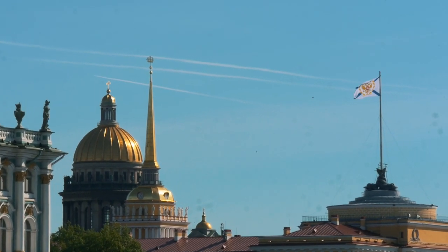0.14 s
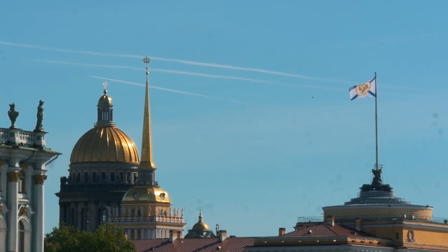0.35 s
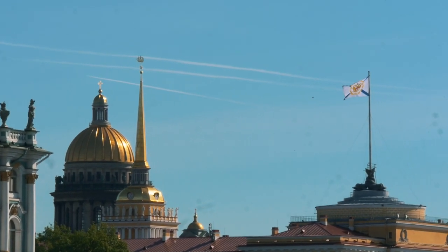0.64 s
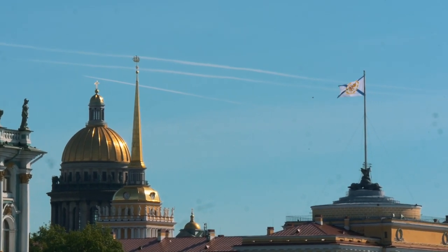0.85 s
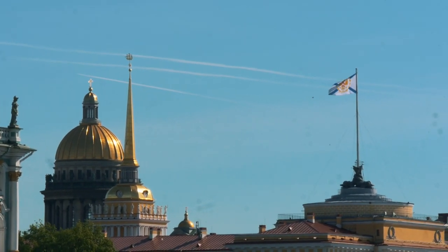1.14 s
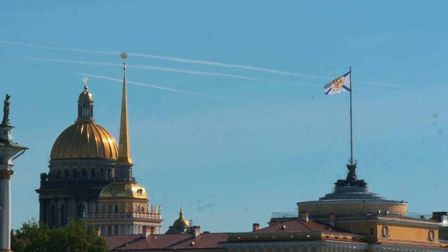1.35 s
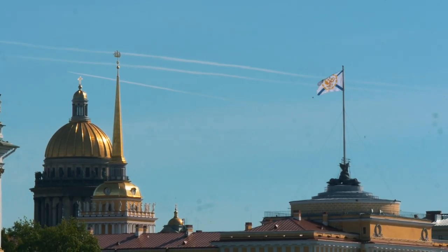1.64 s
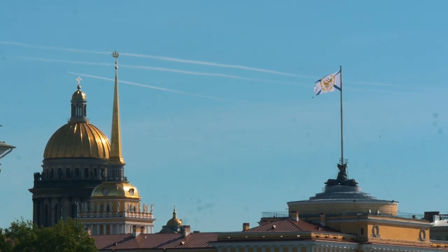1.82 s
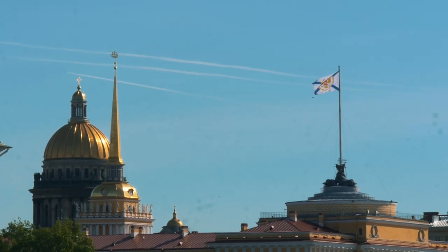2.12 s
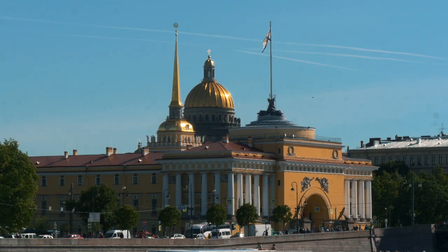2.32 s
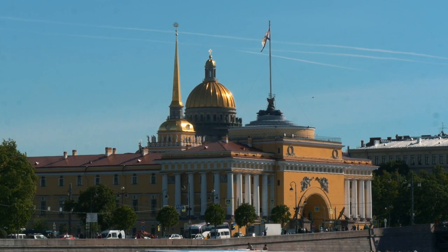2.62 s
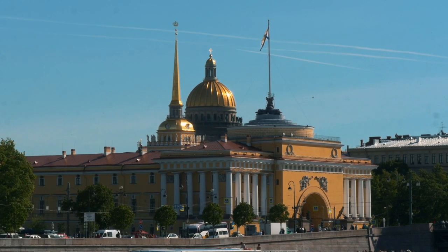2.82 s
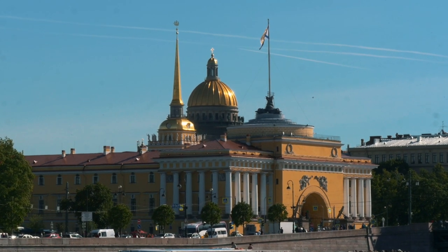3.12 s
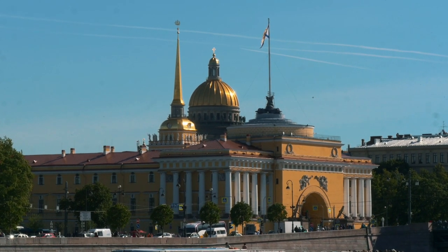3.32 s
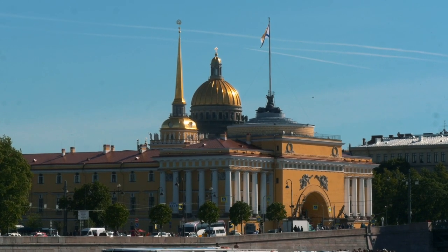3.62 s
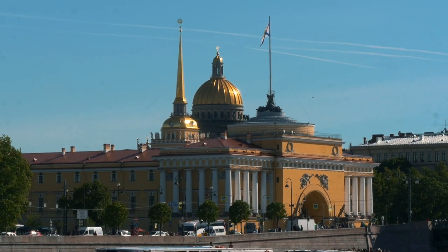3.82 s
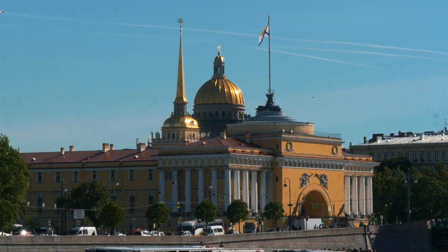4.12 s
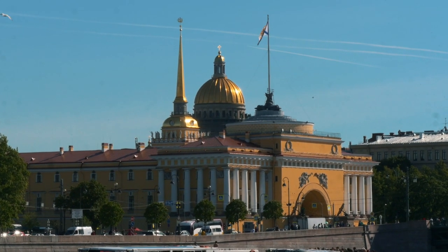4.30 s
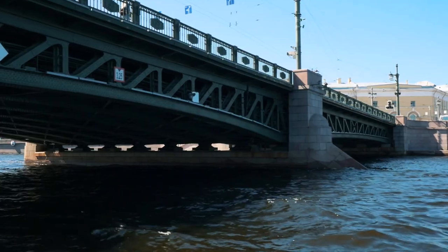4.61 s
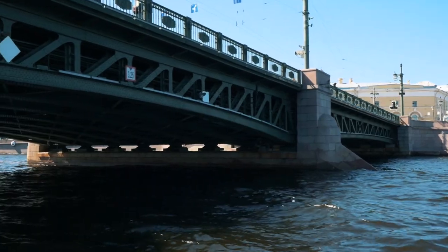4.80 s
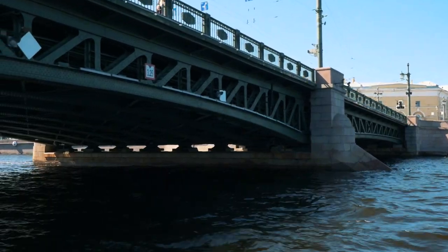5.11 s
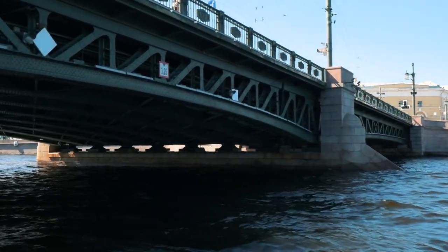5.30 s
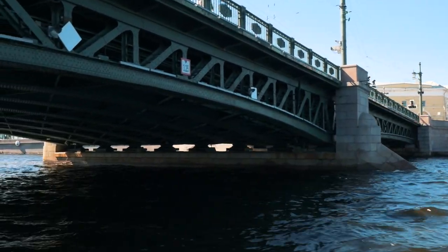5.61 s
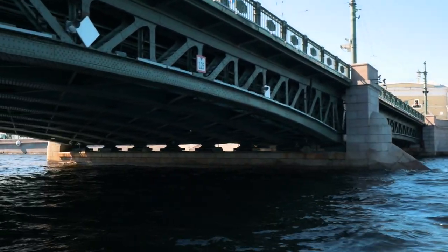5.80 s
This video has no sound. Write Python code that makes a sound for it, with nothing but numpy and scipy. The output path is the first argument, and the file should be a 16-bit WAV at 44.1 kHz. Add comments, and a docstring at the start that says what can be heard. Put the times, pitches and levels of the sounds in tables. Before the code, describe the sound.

Steady low boat engine hum beats ever faster beneath hollow hull booms and a soft rushing wash that swells strongly near the end.

```python
"""Two diesel engines drone on the deck of a river tour boat, while a swell of roar and hiss is already sinking.
One engine drops behind the other, mostly further and further, so their hum throbs faster.
Each engine is a stack of sine waves locked to its turning; a hull panel booms on one of them.
Filtered noise makes the rough engine room and the hiss of bow wash and wind, which surge together.
Hollow resonances of hull and cabin rise and fade: noise and engine tones passed through narrow filters."""
import sys
import numpy as np
from scipy import signal
from scipy.fft import rfft, irfft, next_fast_len
from scipy.io import wavfile
from scipy.ndimage import uniform_filter1d, map_coordinates

SR = 44100
rng = np.random.default_rng(int(sys.argv[2]) if len(sys.argv) > 2 else 0)


def dump(signal):
    """Clip the signal to [-1, 1] and save it as 16-bit WAV at the path in sys.argv[1]."""
    limited = np.clip(np.atleast_2d(signal).T, -1, 1)
    pcm = np.round(limited * 32767).astype(np.int16)
    wavfile.write(sys.argv[1], SR, pcm)


N = 262395  # length in samples

CYCLE_HZ = 16.245  # full working cycles per second; one cycle is two turns of the crankshaft
FIRING_ORDER, PANEL_ORDER = 6, 20  # multiples of the cycle rate: six firings, and the booming tone
TOP_HZ = 15550  # nothing is kept above this pitch
EDGE_S = .004  # fade at either end

# In all tables, left_right_db is how much louder the left side is than the right.
# Noise colours give only the shape of a spectrum; the loudness is set where they are used.

# Colour of the bow wash and wind: pitch_hz, level_db (per Hz)
WASH_COLOUR = [(200, -7), (600, -17.5), (1200, 3.5), (1700, 1), (2500, -3.5), (4000, -9), (6300, -12.5),
               (7500, -14), (11000, -19), (13500, -24), (15500, -23.5)]
# Colour of the spray: pitch_hz, level_db (per Hz)
SPRAY_COLOUR = [(500, -14), (1000, 3), (2400, 1), (5500, -7), (8500, -17), (14000, -28)]
# Small waves at the bow: peak_s, rise_s, fall_s, spray_level_db
BOW_WAVES = [(0.79, 0.06, 0.04, -52), (2.355, .012, 0.022, -52), (2.98, 0.22, 0.06, -49.5)]
# Steady hums of other machinery on board: pitch_hz, level_db, left_right_db
MACHINE_HUMS = [(52.5, -51, 0.5), (158, -51.5, 3), (1265, -58, -13)]
# Colour of the deck's rumble: pitch_hz, level_db (per Hz)
RUMBLE_COLOUR = [(10, -19), (25, -16), (45, -7.5), (65, -3.5), (90, -6), (110, -6), (132, -7), (155, 1),
                 (175, -3), (205, -2.5), (260, -12), (400, -40), (800, -90)]
# Colour of the engine room's roar: pitch_hz, level_db (per Hz)
ROAR_COLOUR = [(120, -14.5), (210, -11.5), (260, -3), (310, -0.5), (370, -6.5), (420, -5), (500, -4),
               (610, -9), (700, -6), (810, -10.5), (910, -10), (1100, -18), (1600, -27.5), (3000, -55),
               (8000, -81)]
# Resonances of hull and cabin: peak_s, rise_s, fall_s, centre_hz, width_hz, level_db, left_right_db
RESONANCES = [(.03, .2, .15, 260, 55, -33, -4), (.02, .3, .26, 470, 140, -30.5, -7),
              (.05, .3, .18, 670, 110, -38.5, -6), (1.18, .06, .15, 680, 45, -37, -7),
              (2.45, .35, .4, 480, 120, -39.5, -5), (2.8, .25, .2, 900, 160, -47, -2),
              (2.9, .3, .25, 158, 26, -42, 3), (4.55, .25, .35, 270, 80, -35.5, -4),
              (4.65, .3, .35, 490, 110, -36, -7), (5.1, .3, .8, 160, 36, -40, 0),
              (5.15, .16, .42, 368, 45, -32, -3), (5.3, .27, .27, 710, 190, -32.8, -7),
              (5.33, .5, .5, 260, 55, -29, -8), (5.48, .3, .28, 470, 130, -30, -8)]
# Colour of combustion noise ringing the hull panel: pitch_hz, level_db (per Hz)
PANEL_COLOUR = [(230, -50), (275, -10), (320, -7), (345, -1), (362, 0), (385, -6), (420, -16), (520, -90)]
# Loudness of the hull panel's boom: time_s, level_db
BOOM_LEVEL = [(0, -29), (0.2, -30.5), (0.35, -38), (0.58, -34), (0.8, -28), (1.08, -24.5), (1.33, -28),
              (2.2, -27), (2.58, -33), (2.85, -28.5), (4.0, -32), (4.25, -37), (4.65, -26), (4.95, -23.3),
              (5.25, -28), (5.5, -30), (5.72, -34.5), (5.95, -34.5)]
# Swing of the boom's phase as the crankshaft speeds up and slows within each turn: time_s, swing_radians
CRANK_SWING = [(0, .4), (.45, .2), (1.0, .42), (1.7, .68), (2.3, .55), (2.6, .48), (3.0, .62), (4.0, .68),
               (4.3, .95), (4.75, .42), (5.3, .7)]
# Firing note of the first engine's exhaust: time_s, level_db, left_right_db
EXHAUST_NOTE = [(0, -28.2, 4), (.6, -28.6, 3), (1, -26.6, 3), (2, -28.6, 3), (2.5, -26.6, 2.5),
                (3.5, -29.3, 1), (4.15, -30, 1), (4.4, -26.3, 6), (4.55, -29.5, 6), (4.7, -25, 8),
                (4.88, -25.3, 14), (5.3, -32, 12), (5.55, -32, 5), (5.75, -28, 3), (5.95, -29.5, 3)]
# Tones of the first engine: order (multiple of the cycle rate), level_db (before swelling), left_right_db
ENGINE_TONES = [(2, -54.5, 2), (4, -52, 0), (5, -54, 6), (7, -45, -3), (10, -55, 6), (11, -56, 10),
                (12, -55, -5), (14, -47, -2), (16, -43, 1), (17, -52, -2), (19, -52, 1), (24, -51, 1),
                (26, -52.5, -10), (27, -52.5, -6), (30, -53, -8), (31, -55, -6), (32, -55, 2),
                (34, -55, -3), (38, -55, -3), (42, -52.5, -8), (44, -56.5, -12), (55, -63, -4)]
# How far an engine tone follows the roar: pitch_hz, follow (dB per dB of roar)
TONE_FOLLOW = [(100, 0.5), (190, .6), (245, .9), (300, 0.5), (470, 1.3), (700, .8)]
# How far the second engine's firing rate lags as it slows unevenly: time_s, lag_hz
FIRING_LAG = [(.14, 0), (.5, 1.2), (1.0, 1.7), (1.95, 2.6), (2.55, 3.25), (2.95, 2.9), (3.3, 3.3),
              (4.0, 3.5), (4.4, 3.85), (4.8, 4.4), (5.95, 5.3)]
# Surges of roar and wash: start_s, end_s, roar_gain_db, wash_gain_db
SURGES = [(-2.0, -.32, 3.2, 4.0), (.45, .6, .3, 1.2), (.8, 1.1, 1.2, .3), (4.1, 5.34, 5, 6.9)]
# Stereo balance of the noise: pitch_hz, left_right_db
NOISE_BALANCE = [(35, 0), (100, 3.5), (220, -2), (330, -3), (480, -5), (700, -4.5), (1200, -2.5),
                 (2400, -1), (7000, -1), (14000, 0.5)]
# How far the left side leads the right: pitch_hz, lead_radians
LEFT_LEAD = [(30, 2.9), (80, 2.75), (100, 2.66), (160, 1.1), (230, 1.7), (325, 1.25), (430, .6), (700, .6),
             (1000, 0)]
# How alike the noise is on both sides: pitch_hz, alike (0 to 1, share of power in common)
NOISE_ALIKE = [(50, 0.81), (130, 0.53), (300, 0.83), (640, 0.19), (1400, 0.28), (3100, 0.4), (7000, 0.12),
               (15000, .05)]

# Starting levels, without the surges, and how fast they ease off
ROAR_DB, ROAR_EASE_DB_PER_S = -35, .23
WASH_DB, WASH_EASE_DB_PER_S = -47.5, .25
# In a surge the wash takes longer than the roar to reach its full gain, and longer to sink back
ROAR_RISE_S, ROAR_FALL_S = .65, .72
WASH_RISE_S, WASH_FALL_S = .8, .96
PANEL_NOISE_DB = -12.5  # compared with the boom
TWIN_EXHAUST_DB, TWIN_EXHAUST_LEFT_DB = -31.2, 2  # the second exhaust holds its level
TWIN_LEFT_DB = -9  # left-right dB: the second engine's overtones come from the right
UNEVEN_DB = .9  # the exhaust note wavers from cycle to cycle


def amp(db):
    """Turn decibels into gain."""
    return 10 ** (np.asarray(db) / 20)


def unit(x):
    """Scale to an average (rms) strength of 1."""
    return x / np.sqrt(np.mean(np.abs(x) ** 2) + 1e-20)


def along(points, hz):
    """Read a table of pitch and value at any pitch, on a log pitch axis."""
    f, value = np.transpose(points)
    return np.interp(np.log(hz + 1), np.log(f + 1), value)


def curves(rows):
    """Turn each column after the time into one value per sample."""
    s, *columns = np.transpose(rows)
    return [np.interp(np.arange(N) / SR, s, column) for column in columns]


def wobble(rate):
    """Draw a smooth random curve with the given number of random points a second."""
    coarse = np.arange(0, N + 64, 64)
    knots = rng.standard_normal(512)
    smooth = map_coordinates(knots, [coarse * rate / SR], mode="wrap")
    return np.interp(np.arange(N), coarse, smooth)


def bump(peak, rise_s, fall_s):
    """Make a bell curve that rises to 1 at its peak time and dies away."""
    t = np.arange(N) / SR
    return np.exp(-((t - peak) / np.where(t < peak, rise_s, fall_s)) ** 2)


def filtered(x, response):
    """Filter a sound by multiplying its spectrum with a response."""
    m = next_fast_len(N + SR // 2)
    spectrum = rfft(x, m) * response(np.fft.rfftfreq(m, 1 / SR))
    return irfft(spectrum, m)[..., :N]


def ports(hz, left_right_db):
    """Place a sound in stereo by a level difference and a phase lead, keeping its mean power."""
    sides = np.array([[.5], [-.5]])
    gain = amp(sides * left_right_db)
    level = gain / np.sqrt(np.mean(gain ** 2, axis=0))
    return level * np.exp(1j * sides * along(LEFT_LEAD, hz))


def rush(spectrum, patchy_db):
    """Make coloured stereo noise of rms 1, in patches of random gain and partly alike on both sides."""
    z = signal.stft(rng.standard_normal((3, N)), nperseg=512)[2]
    field = uniform_filter1d(rng.standard_normal(z.shape[1:]), size=6, axis=0)
    field = uniform_filter1d(field, size=14, axis=1)
    noise = signal.istft(z * amp(patchy_db * unit(field)), nperseg=512)[1][:, :N]

    def share(hz):
        return np.clip(along(NOISE_ALIKE, hz), 0, 1)

    def colour(hz):
        return amp(along(spectrum, hz)) * ports(hz, along(NOISE_BALANCE, hz))

    common = filtered(noise[2], lambda hz: colour(hz) * np.sqrt(share(hz)))
    separate = filtered(noise[:2], lambda hz: colour(hz) * np.sqrt(1 - share(hz)))
    return unit(common + separate)


def surge(t, start, end, rise_s, fall_s):
    """Swell smoothly from 0 towards 1 after the start, and sink back after the end."""
    def ramp(u):
        return np.sin(np.pi / 2 * np.clip(u, 0, 1)) ** 2

    return ramp((t - start) / rise_s) * (1 - ramp((t - end) / fall_s))


def flow():
    """Set the levels of roar and wash in dB: a slow easing, lifted by each surge."""
    t = np.arange(N) / SR
    roar_db = ROAR_DB - ROAR_EASE_DB_PER_S * t
    wash_db = WASH_DB - WASH_EASE_DB_PER_S * t
    for start, end, roar_gain_db, wash_gain_db in SURGES:
        roar_db = roar_db + roar_gain_db * surge(t, start, end, ROAR_RISE_S, ROAR_FALL_S)
        wash_db = wash_db + wash_gain_db * surge(t, start, end, WASH_RISE_S, WASH_FALL_S)
    return roar_db, wash_db


def crank(unsteady_hz):
    """Track the cycle angle of an engine whose governor hunts a little for its speed."""
    return 2 * np.pi * np.cumsum(CYCLE_HZ + unsteady_hz * wobble(9)) / SR


def pulsing(first, throb, chug):
    """Make the noise strength pulse with the cycle, the crankshaft and the firings."""
    slow = np.cos(first) + np.cos(2 * first)
    firings = np.cos(3 * first) + np.cos(6 * first)
    return 1 + throb * slow + chug * firings


def wash(wash_db):
    """Bow wash and wind are a fine, slightly patchy hiss; small waves breaking at the bow add spray."""
    hiss = amp(wash_db + 0.45 * wobble(20)) * rush(WASH_COLOUR, patchy_db=0.62)
    splashes = sum(amp(db) * bump(peak, rise, fall) for peak, rise, fall, db in BOW_WAVES)
    return hiss + splashes * rush(SPRAY_COLOUR, patchy_db=3.0)


def machinery():
    """Other machines give faint, slightly wavering hums that do not keep step with the engines."""
    t = np.arange(N) / SR
    hums = np.zeros((2, N))
    for hz, db, left_right_db in MACHINE_HUMS:
        angle = 2 * np.pi * hz * t + 1.56 * wobble(3.86)
        hums += np.real(amp(db) * np.exp(1j * angle) * ports(hz, left_right_db))
    return hums


def engine_room(pulse, roar_db, load_db):
    """Rough combustion noise pulses with the engine, over a rumble of the deck."""
    roar = amp(roar_db) * unit(pulse * rush(ROAR_COLOUR, patchy_db=0.57))
    rumble = amp(-40.5 + 0.54 * load_db) * rush(RUMBLE_COLOUR, patchy_db=-1.0)
    return roar + rumble


def howls(first, pulse, tonal):
    """Each hollow resonance rings with combustion noise and with the engine tones that fall inside it."""
    length = next_fast_len(N)
    hz = np.fft.rfftfreq(length, 1 / SR)[:N // 12]  # only the low part of the spectrum is needed
    share = np.clip(along(NOISE_ALIKE, hz), 0, 1)
    tonal = np.clip(tonal, 0, 1)  # share of power that is tone rather than noise
    orders = np.arange(8, 52)
    starts = rng.uniform(0, 2 * np.pi, size=(len(orders), 1))
    lines = np.exp(1j * (np.outer(orders, first[::8]) + starts))  # every 8th sample, to save work
    out = np.zeros((2, N))
    for peak, rise, fall, centre, width, db, left_right_db in RESONANCES:
        def ring(f):
            return ports(f, left_right_db) / (1 + (2 * (f - centre) / width) ** 4) ** .75

        draws = rng.standard_normal((3, len(hz))) + 1j * rng.standard_normal((3, len(hz)))
        mixed = np.sqrt(share) * draws[2] + np.sqrt(1 - share) * draws[:2]
        noise = irfft(mixed * ring(hz), length)[:, :N]
        coarse_tone = np.real(ring(orders * CYCLE_HZ) @ lines)
        tone = signal.resample_poly(coarse_tone, 8, 1, axis=1, window=("kaiser", 10))[:, :N]
        ringing = np.sqrt(1 - tonal) * unit(pulse * noise) + np.sqrt(tonal) * unit(tone)
        out += amp(db) * bump(peak, rise, fall) * ringing
    return out


def hull(first, second, twin_db, left_right_db, twin_left_right_db, waver):
    """A panel booms on one engine order, swung by the crankshaft, with a faint twin and a noisy halo."""
    db, = curves(BOOM_LEVEL)
    swing, = curves(CRANK_SWING)
    hz = PANEL_ORDER * CYCLE_HZ
    # the crankshaft turns twice per cycle
    uneven = swing * (1 + waver * wobble(12)) * np.sin(2 * (first + waver * wobble(11)))
    boom = np.exp(1j * (PANEL_ORDER * first + uneven)) * ports(hz, left_right_db)
    twin = amp(twin_db) * np.exp(1j * PANEL_ORDER * second) * ports(hz, twin_left_right_db)
    halo = amp(PANEL_NOISE_DB) * rush(PANEL_COLOUR, patchy_db=-2.5)
    return amp(db) * (unit(np.real(boom + twin)) + halo)


def exhausts(first, second):
    """Both six-cylinder exhausts sound their firing note and beat against each other."""
    db, left_right_db = curves(EXHAUST_NOTE)
    hz = FIRING_ORDER * CYCLE_HZ
    level = amp(db + UNEVEN_DB * wobble(CYCLE_HZ))
    note = level * np.exp(1j * FIRING_ORDER * first) * ports(hz, left_right_db)
    twin = np.exp(1j * FIRING_ORDER * second) * ports(hz, TWIN_EXHAUST_LEFT_DB)
    return np.sqrt(2) * np.real(note + amp(TWIN_EXHAUST_DB) * twin)


def drone(first, second, load_db, twin_db, flutter):
    """Unequal cylinders give tones at multiples of the cycle rate, weaker from the second engine."""
    out = np.zeros((2, N))
    for order, db, left_right_db in ENGINE_TONES:
        k = round(order)
        hz = k * CYCLE_HZ
        start = rng.uniform(0, 2 * np.pi, size=2)
        line = np.exp(1j * (k * first + start[0])) * ports(hz, left_right_db)
        line += amp(twin_db) * np.exp(1j * (k * second + start[1])) * ports(hz, TWIN_LEFT_DB)
        line *= unit(1 + flutter * k * (wobble(7) + 1j * wobble(5.9)))  # high orders are less steady
        swell_db = along(TONE_FOLLOW, hz) * load_db
        out += np.sqrt(2) * amp(db + swell_db) * np.real(line)
    return out


def scene():
    """Add up the river, the boat's hull and the two engines."""
    lag_hz, = curves(FIRING_LAG)
    roar_db, wash_db = flow()
    load_db = roar_db - np.median(roar_db)
    first = crank(unsteady_hz=.015)
    second = first - 2 * np.pi * np.cumsum(lag_hz / FIRING_ORDER) / SR
    pulse = pulsing(first, throb=.1, chug=.09)
    background = wash(wash_db) + machinery()
    roar = engine_room(pulse, roar_db, load_db) + howls(first, pulse, tonal=0.44)
    hum = hull(first, second, twin_db=-16, left_right_db=2, twin_left_right_db=TWIN_LEFT_DB, waver=.2)
    hum += exhausts(first, second)
    hum += drone(first, second, load_db, twin_db=-6, flutter=.013)
    return background + roar + hum


def record(dry):
    """Fade both ends briefly to avoid clicks, and cut everything above the top pitch."""
    t = np.arange(N) / SR
    edges = np.sin(np.pi / 2 * np.clip(np.minimum(t, t[-1] - t) / EDGE_S, 0, 1)) ** 2
    return filtered(dry * edges, lambda hz: hz < TOP_HZ)


dry = scene()
out = record(dry)
dump(out)
```